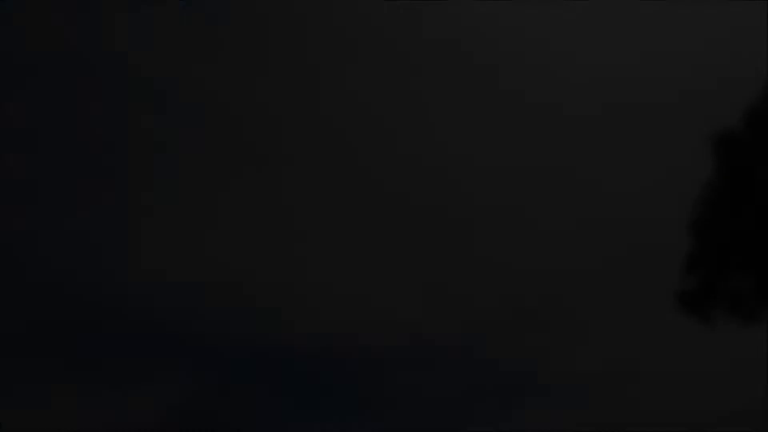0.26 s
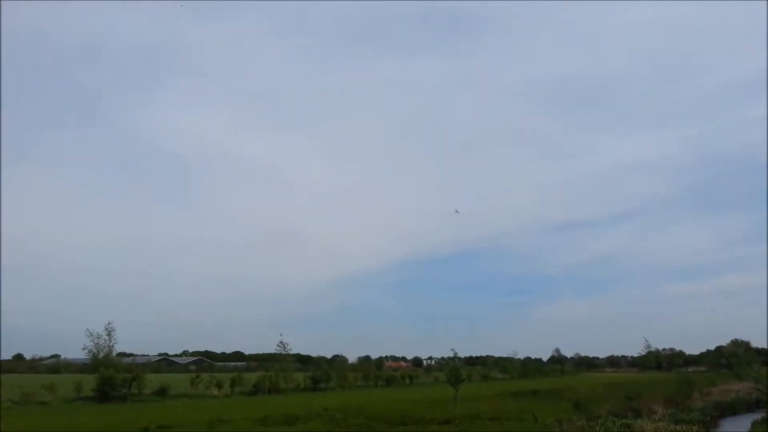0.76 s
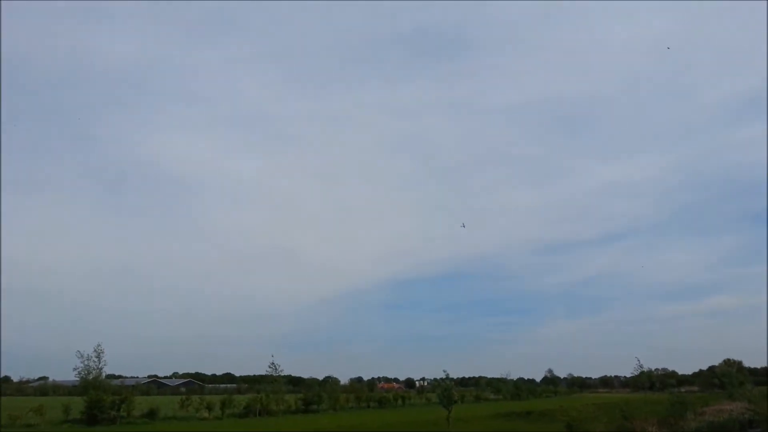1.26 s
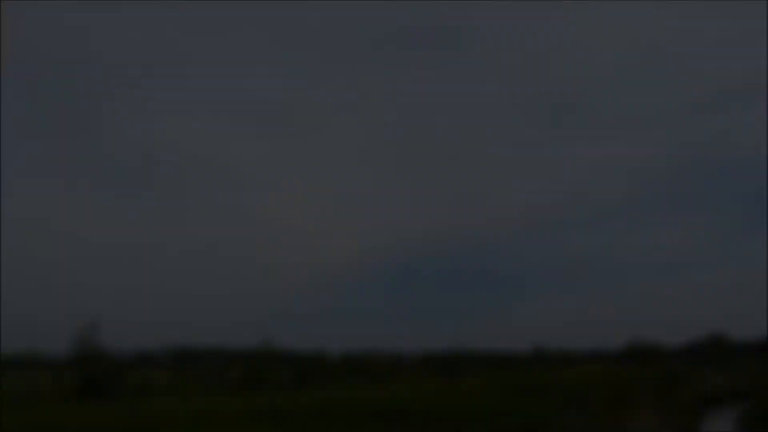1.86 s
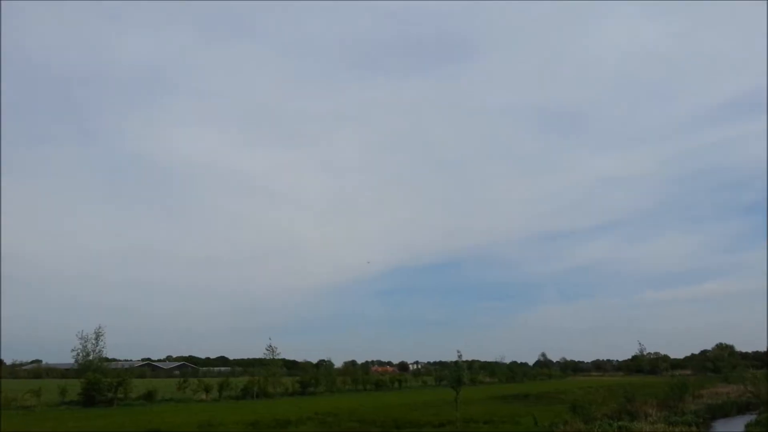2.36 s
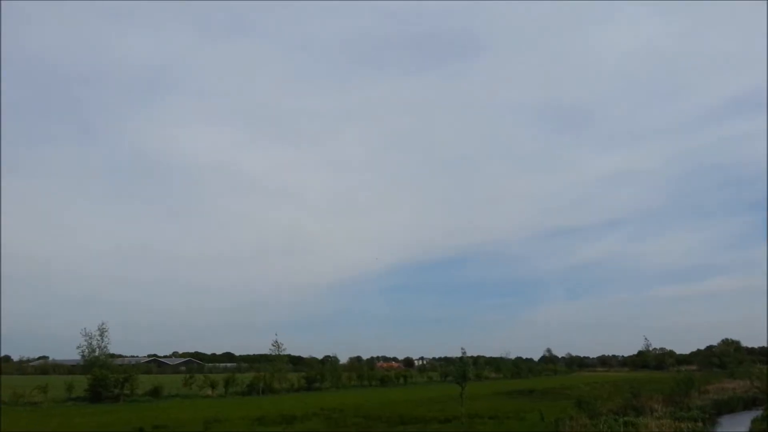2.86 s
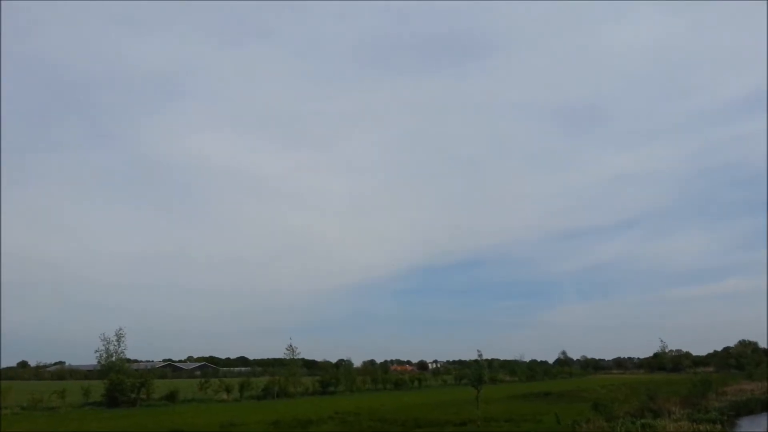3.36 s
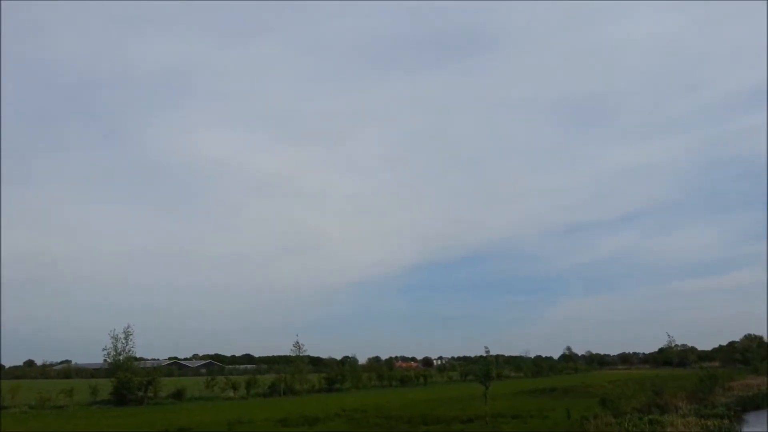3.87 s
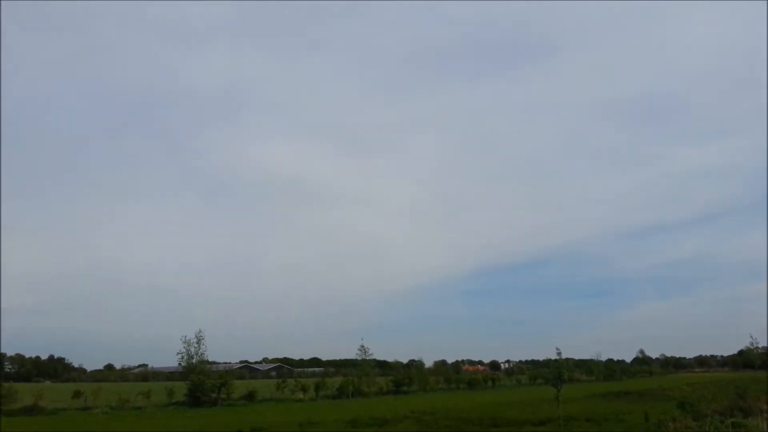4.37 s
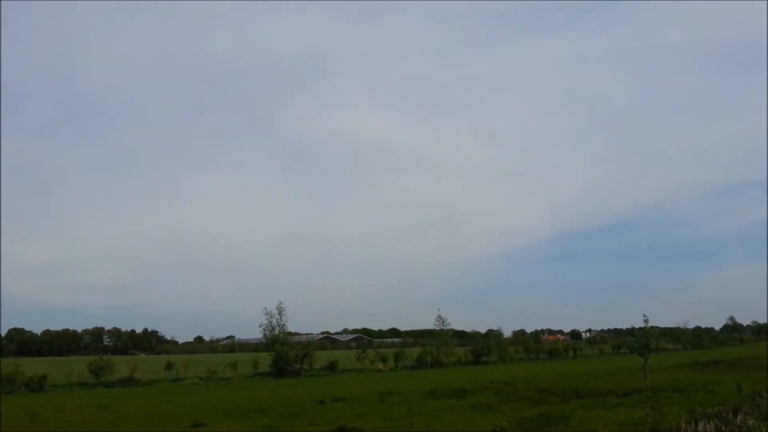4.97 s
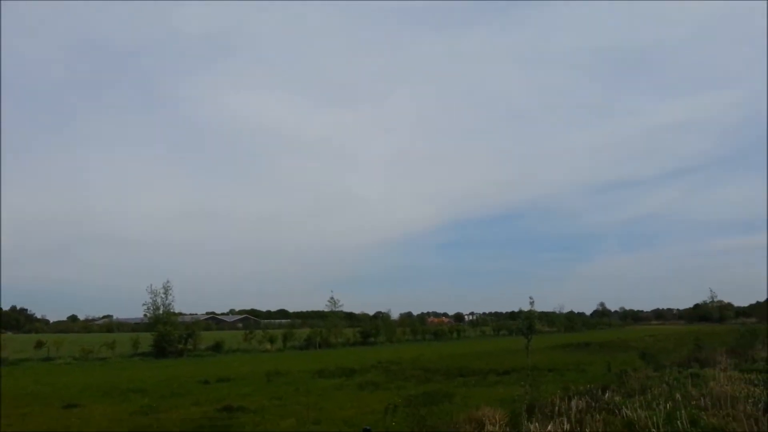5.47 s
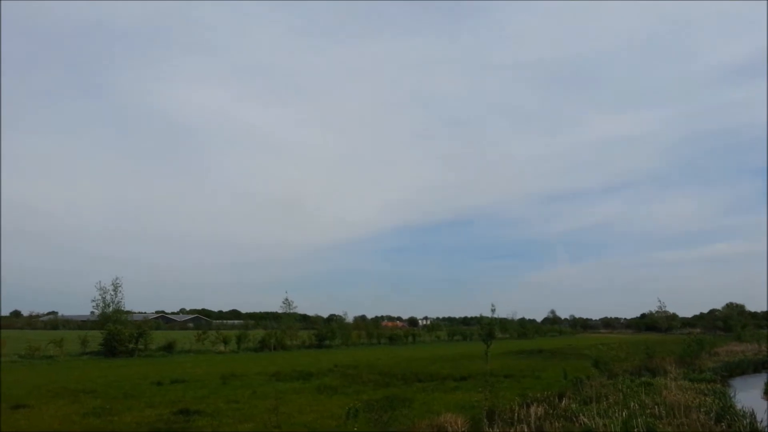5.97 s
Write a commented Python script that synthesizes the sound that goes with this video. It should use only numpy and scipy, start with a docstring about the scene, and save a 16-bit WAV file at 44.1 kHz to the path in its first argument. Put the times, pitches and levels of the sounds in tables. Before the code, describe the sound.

Wind gusts thud on the microphone, then ease to a quiet field with a faint motor hum, distant chirps and a finch's trill.

```python
"""Gusts of wind thud and flutter on a hand-held microphone as swirls of air sweep past its opening.
Under them lie the hush of open fields and a small motor that hums at a steady speed.
Fingers tick and briefly rub on the housing; later a steady, broad hiss sets in and stops abruptly.
A thin high tone comes and goes, and the motor's gear clicks.
Small birds chirp, most of them far off; then a finch sings its falling trill and closing flourish."""
import sys
import numpy as np
from scipy import signal
from scipy.fft import rfft, irfft
from scipy.io import wavfile
from scipy.ndimage import uniform_filter1d, map_coordinates

SR = 44100
rng = np.random.default_rng(int(sys.argv[2]) if len(sys.argv) > 2 else 0)


def materialize(psi):
    """Save the field psi as 16-bit PCM at rate SR to the path in sys.argv[1].

    A 1-D psi becomes a single channel; in a 2-D psi each row is a channel.
    """
    bounded = np.clip(np.atleast_2d(psi).T, -1, 1)
    quanta = np.round(bounded * 32767).astype(np.int16)
    wavfile.write(sys.argv[1], SR, quanta)


N = 274302
TIME_S = np.arange(N) / SR
MOTOR_HZ = 39.78   # turns per second


def amp(db):
    """Turn decibels into a factor to multiply by."""
    return 10 ** (np.asarray(db, float) / 20)


def rms_one(x):
    """Scale a signal so that its average strength (rms) is 1."""
    return x / np.sqrt(np.mean(x ** 2) + 1e-20)


def curves(rows):
    """Join rows of (time_s, values...) with straight lines: one curve for each value."""
    times, *columns = np.transpose(rows)
    return [np.interp(TIME_S, times, column) for column in columns]


def coloured_noise(spectrum, size=N, sample_rate=SR):
    """Noise of strength 1, shaped by rows of (frequency, level_db)."""
    freqs = np.maximum(np.fft.rfftfreq(size, 1 / sample_rate), 1e-3)
    row_freqs, row_db = np.transpose(spectrum)
    gain = amp(np.interp(np.log(freqs), np.log(row_freqs), row_db, left=-120, right=-120))
    return rms_one(irfft(rfft(rng.standard_normal(size)) * gain, size))


def drift(rate_hz):
    """A smooth random wander of strength 1; a higher rate wanders faster."""
    r = np.exp(-2 * np.pi * rate_hz / SR)
    wander = signal.lfilter([1], [1, -2 * r, r * r], rng.standard_normal(N + 20000))
    return rms_one(wander[20000:])   # skip the filter's warm-up


def add(out, start_s, sound):
    """Mix a sound into out at the given time."""
    i = max(round(start_s * SR), 0)
    out[i:i + len(sound)] += sound[:len(out) - i]


def wind():
    """A fixed pattern of swirls sweeps past the microphone: faster air sounds higher and brighter."""
    # the breeze under the gusts: time_s, level_db
    breeze = [(0.0, -22.5), (0.08, -29), (0.42, -24.5), (0.53, -27.5), (0.74, -40), (1.39, -44.5),
              (1.56, -35.5), (1.71, -30), (1.82, -29.5), (2.04, -36), (2.67, -40), (2.79, -43),
              (6.22, -44.5)]
    # single gusts: start_s, level_db, speed_m_per_s
    gusts = [(0.087, -19.5, 3.3), (0.141, -20, 5.07), (0.167, -17, 3.85), (0.192, -14, 3.84),
             (0.254, -19, 4.05), (0.279, -20, 4.3), (.305, -22, 3.22), (.333, -11, 5.18),
             (0.351, -14, 6.55), (.442, -17, 6.6), (0.452, -8, 9.14), (0.464, -12, 6.56),
             (0.499, -15, 3.76), (0.545, -3, 7.73), (0.563, -5.5, 6.74), (0.581, -17, 4.6),
             (0.598, -26.5, 3.43), (0.697, -19, 3.24), (1.05, -40, 1.88), (1.519, -17, 3.77),
             (1.548, -18, 3.87), (1.58, -21, 2.48), (1.666, -22, 3.2), (1.7, -26.5, 2.62),
             (1.814, -22, 3.23), (1.845, -25, 3), (1.906, -22, 3.2), (1.922, -17, 2.68), (1.946, -18, 3.8),
             (1.972, -21, 3.2), (2.089, -35, 1.96), (2.252, -25.5, 2.42), (2.33, -14.5, 3.3),
             (2.409, -32, 2.02), (2.615, -31.5, 2), (2.69, -32.5, 2.2), (2.721, -23, 3.25),
             (2.767, -28, 2.26), (3.038, -34.5, 1.58), (3.6, -38.5, 1.22), (4.298, -35.5, 1.33),
             (4.5, -37.5, 1.42), (4.64, -39, 1.31), (5.74, -39, 1.49)]
    # strength of the swirls, from large to small: cycles_per_m, level_db
    swirls = [(3, -36), (8, -3.5), (20, -3), (45, -0.5), (90, -9), (160, -21), (300, -43), (600, -62),
              (1500, -85)]
    breeze_m_per_s, gust_m = 2.02, .095   # all gusts are about this long, so fast ones pass quickly
    breeze_db, = curves(breeze)
    power = amp(breeze_db) ** 2
    weighted_speed = power * breeze_m_per_s
    for start_s, level_db, speed in gusts:
        length_s = gust_m / speed
        t = np.arange(round(3 * length_s * SR)) / SR
        sudden_front = np.minimum(t / .004, 1) ** 2
        gust = amp(level_db) ** 2 * sudden_front * np.exp(-(t / length_s) ** 2.5)
        slowing = .6 + .6 * np.exp(-t / length_s)
        add(power, start_s, gust)
        add(weighted_speed, start_s, gust * speed * slowing)
    air_speed = np.clip(weighted_speed / power, .3, 12)   # the strongest gust counts most
    travelled_m = np.cumsum(air_speed) / SR
    points_per_m = 8000
    pattern = coloured_noise(swirls, size=2 ** 19, sample_rate=points_per_m)
    flutter = map_coordinates(pattern, [travelled_m * points_per_m], order=3, mode="wrap")
    flutter /= np.sqrt(uniform_filter1d(flutter ** 2, size=1500) + 0.27)   # let the gusts set the level
    lumps = rms_one(amp(2 * drift(rate_hz=63)))
    low_cut = signal.butter(3, 46.4, "high", fs=SR, output="sos")
    return signal.sosfilt(low_cut, np.sqrt(power) * flutter * lumps)


def field_hush():
    """The soft noise of open fields, wavering a little in level."""
    # tone colour of the hush: pitch_hz, level_db
    colour = [(12, -42), (20, 7.5), (52, -6), (146, -37), (210, -14), (388, -10.5), (780, -12), (1220, -17),
              (1910, -17.5), (2910, -22.5), (3440, -22.5), (5530, -22), (7950, -29.5), (14700, -35),
              (16000, -32)]
    return amp(-49 + 1.16 * drift(rate_hz=4.6)) * coloured_noise(colour)


def motor_hum():
    """A steadily turning motor gives tones at multiples of its speed, plus two tones that lie between
    multiples, each wavering in level."""
    # tones of the hum: cycles_per_turn, level_db
    tones = [(1, -47.5), (2, -51), (3, -55.5), (4, -52), (5, -61.5), (6, -63), (8, -66), (14.74, -67.5),
             (20, -66), (22.15, -68.5)]
    angle = 2 * np.pi * MOTOR_HZ * TIME_S
    out = np.zeros(N)
    for cycles, level_db in tones:
        gain = np.sqrt(2) * amp(level_db + 0.83 * drift(rate_hz=4.3))
        out += gain * np.sin(cycles * angle + rng.uniform(0, 2 * np.pi))
    return out


def rubs_and_hiss():
    """Grainy noise: brief early rubs on the housing, then a steady, broad hiss that stops abruptly."""
    # the rubs and, from 1.5 s, the hiss: time_s, level_db, bright_share (0 to 1)
    outline = [(.085, -71, 0.5), (.1, -40.5, 0.7), (.135, -49, 0.66), (.2, -42.5, 0.05), (.24, -48, 0.44),
               (.295, -39, 0.46), (.32, -43, 0.11), (.45, -47, 0.1), (.52, -52.5, 0.33), (.56, -45.5, 0.6),
               (.62, -51, 0.07), (.76, -54, 0.3), (.8, -65, 0.51), (1.01, -66, 0.5), (1.1, -67.5, 0.49),
               (1.5, -72, 0.38), (1.53, -54, 0.34), (2.1, -52, 0.3), (2.2, -52, 0.53), (2.23, -83, 0.39)]
    # the dull and bright tone colours that are blended: pitch_hz, level_db
    dull = [(700, -1), (1300, 5), (2000, 6), (2700, -4.5), (3500, -1), (5000, -36), (8000, -47)]
    bright = [(2500, 3.5), (4000, 3), (6500, 6), (9000, -3.5), (15000, -4.5)]
    level_db, bright_share = curves(outline)
    noise = np.sqrt(1 - bright_share) * coloured_noise(dull)
    noise += np.sqrt(bright_share) * coloured_noise(bright)
    sounding = TIME_S < outline[-1][0]
    return amp(level_db + 2 * drift(rate_hz=24)) * noise * sounding


def finger_ticks():
    """Fingers tap the housing: each tap is a tiny burst of noise that sets it ringing."""
    # taps: start_s, level_db, lowest_hz, width_octaves
    taps = [(0.0875, -19, 5500, 0.72), (.1671, -9, 2870, 1.65), (.2214, -33, 4000, 1.15),
            (0.251, -32, 3500, 2.2), (.289, -27, 4000, 1.5), (.38, -37.5, 5030, 1),
            (0.784, -28.5, 3770, 1.14), (.93, -42, 5420, 0.58), (0.9574, -32, 5935, 1.4),
            (1.004, -41, 5970, 1.23), (1.0613, -40.5, 5480, 1.38), (1.073, -40, 6010, 0.95),
            (2.035, -39, 6000, 1.11), (2.1156, -29, 5730, 0.72), (2.124, -20, 5800, 0.45),
            (2.164, -28, 3264, 1.3), (2.2, -39, 5980, 1.15), (2.469, -39, 2762, 1.12)]
    # tones the housing rings at: pitch_hz, level_db, ring_ms (time to fade by 60 dB)
    housing = [(3200, -1, 10.8), (4950, -0.5, 9)]
    out, fade_s = np.zeros(N), .0067
    fade = amp(-60 * TIME_S[:1500] / fade_s)
    for start_s, level_db, lowest_hz, octaves in taps:
        highest_hz = min(lowest_hz * 2 ** octaves, .45 * SR)
        band = signal.butter(2, [lowest_hz, highest_hz], "band", fs=SR, output="sos")
        tick = signal.sosfilt(band, rng.standard_normal(len(fade)) * fade)
        add(out, start_s, amp(level_db) * tick / np.abs(tick).max())
    for pitch_hz, level_db, ring_ms in housing:
        decay, step = amp(-60000 / (ring_ms * SR)), 2 * np.pi * pitch_hz / SR   # both per sample
        ring = signal.lfilter([1, 0, -1], [1, -2 * decay * np.cos(step), decay ** 2], out + 1e-18)
        out += amp(level_db) * (1 - decay) * 4 * ring
    return out


def microphone_pops():
    """A lone swirl (wide pop) or a knock (narrow pop) shoves the microphone's skin, which swings back."""
    # shoves: time_s, level_db, width_ms, direction (+1 push, -1 pull)
    shoves = [(0.0898, 0, 0.073, -1), (0.1688, -2, 0.13, -1), (.267, -9.5, 0.43, 1), (.361, -2.5, 0.37, -1),
              (0.4549, -1, 0.21, -1), (0.458, 0, 0.25, 1), (.537, -1, 1.21, 1), (.551, 6, 0.25, 1),
              (0.572, -9, 0.59, 1), (0.765, -21, 0.052, -1), (0.7843, -20, 0.11, 1), (0.955, -28, 0.1, 1),
              (0.9572, -11, 0.061, 1), (1.527, -5, 0.76, 1), (1.569, -7.5, 0.64, 1), (1.672, -9.5, 0.53, 1),
              (1.948, -21, 0.57, 1), (2.335, -7.5, 1.03, 1)]
    out = np.zeros(N)
    t = np.arange(-200, 2001) / SR
    for time_s, level_db, width_ms, direction in shoves:
        widths = t * 1000 / width_ms
        push = np.exp(-widths ** 2 / 2)
        rebound = .3 * np.exp(-((widths - 3.5) / 2.5) ** 2 / 2)
        add(out, time_s + t[0], direction * amp(level_db) * (push - rebound))
    return out


def repeat(syllable, first_s, level_db, count=1, every_s=0, soft_start_db=0, sink=0):
    """List the notes of a repeated syllable; it may start softly, or sink in pitch by a share each time."""
    notes, swell_s = [], .18
    for k in range(count):
        start_s = first_s + k * every_s
        syllable_db = level_db + soft_start_db * np.exp(-k * every_s / swell_s)
        for delay_s, length_s, *pitches_hz, note_db, buzz in syllable:
            pitches_hz = np.array(pitches_hz) * (1 - sink) ** k
            notes.append((start_s + delay_s, length_s, *pitches_hz, syllable_db + note_db, buzz))
    return notes


def small_bird_notes():
    """List the scattered calls of small birds, as notes for birdsong()."""
    # held and buzzy calls: start_s, length_s, start_hz, middle_hz, end_hz, level_db, buzz (0 to 1)
    calls = [(.2, 0.21, 3560, 3530, 3430, -51.5, 0.48), (.36, 0.11, 5300, 5010, 4950, -58, 0.2),
             (1.089, 0.257, 3462, 3480, 3430, -63, 0.39), (1.125, 0.06, 5600, 5074, 5000, -58, 0.2),
             (2.04, .068, 4906, 3962, 3376, -50, 0.04), (2.44, 0.047, 3852, 3780, 3550, -50.5, 0.06),
             (2.54, .04, 3160, 3168, 2604, -48, .15), (2.87, 0.013, 7210, 6200, 5210, -53, 0.7),
             (2.955, 0.054, 2632, 2904, 3205, -52.5, 0.76), (2.99, 0.0527, 950, 933, 892, -47.5, 1),
             (3.03, .025, 5095, 4497, 4400, -50, 0.47), (3.145, 0.14, 6014, 5960, 5987, -56.5, 0.21)]
    # falling chirps, and high peeps that sag: start_s, length_s, middle_hz, level_db
    chirps = [(1.01, 0.021, 3400, -60), (1.075, .024, 3400, -51.5), (1.155, 0.034, 3483, -54),
              (1.247, 0.036, 3570, -54), (1.356, 0.034, 3450, -54), (2.634, .04, 4476, -51.5),
              (3.167, 0.06, 4080, -49), (4.88, .036, 5573, -56)]
    peeps = [(.82, 0.034, 4600, -55), (1.818, 0.04, 5200, -46), (1.947, .017, 5150, -47.5),
             (2.068, 0.024, 5100, -40.5), (2.19, .019, 5030, -40), (2.443, .025, 4980, -57)]
    # quick upward flicks: start_s, middle_hz, level_db
    flicks = [(1.96, 5443, -48.5), (2.088, 5250, -41), (2.172, 4240, -42), (2.192, 4126, -44),
              (2.212, 4180, -43), (2.232, 4010, -44.5), (2.49, 3480, -48), (2.506, 3424, -47.5),
              (2.524, 3450, -54), (3.238, 3716, -50)]
    # a nearer bird's down-and-up call: delay_s, length_s, start_hz, middle_hz, end_hz, level_db, buzz
    dip = [(0, .041, 3690, 3325, 2860, -2, 0.47), (.035, .041, 2720, 3200, 3280, -0.1, 0.021)]
    notes, fall_hz_per_s = list(calls), 40000
    for start_s, length_s, hz, level_db in chirps:
        half_fall_hz = fall_hz_per_s * length_s / 2
        notes.append((start_s, length_s, hz + half_fall_hz, hz, hz - half_fall_hz, level_db, .23))
    for start_s, length_s, hz, level_db in peeps:
        notes.append((start_s, length_s, hz * 1.05, hz, hz * .95, level_db, .07))
    for start_s, hz, level_db in flicks:
        notes.append((start_s, .0113, hz * .9, hz, hz * 1.1, level_db, .06))
    return notes + repeat(dip, first_s=2.308, level_db=-44, count=2, every_s=.417, sink=.086)


def birdsong(notes):
    """Each note is a gliding whistle; buzz shakes its pitch fast. Hedges and ground add echoes."""
    song, shake = np.zeros(N), drift(rate_hz=650)
    for start_s, length_s, start_hz, middle_hz, end_hz, level_db, buzz in notes:
        u = np.linspace(-1, 1, round(length_s * SR))   # -1 at the note's start, +1 at its end
        bend_hz = (start_hz + end_hz) / 2 - middle_hz
        glide_hz = middle_hz + (end_hz - start_hz) / 2 * u + bend_hz * u ** 2
        wobble = np.resize(shake[round(start_s * SR):], len(u))
        pitch_hz = glide_hz * (1 + .127 * buzz * wobble)
        loudness = np.sqrt(2) * amp(level_db) * np.sqrt(1 - u ** 4)
        add(song, start_s, loudness * np.sin(2 * np.pi * np.cumsum(pitch_hz) / SR))
    farness = np.where((TIME_S > 1.7) & (TIME_S < 2.9), .5, .84)   # a nearer bird sings for a while
    song *= rms_one(amp(3 * farness * drift(rate_hz=94)))   # moving air makes far notes flicker
    t = TIME_S[:SR // 2]
    echo_db, echo_fade_s = -2.5, .28
    echoes = rng.standard_normal(len(t)) * amp(-60 * t / echo_fade_s) * (t > .004)
    echoes /= np.sqrt(np.sum(echoes ** 2))
    return song + amp(echo_db) * signal.fftconvolve(farness * song, echoes)[:N]


def whine():
    """One thin, high tone that fades in and out."""
    pitch_hz, level_db, start_s, stop_s, fade_s = 14998, -76, .5, 2.22, .046
    fade = np.clip(np.minimum(TIME_S - start_s, stop_s - TIME_S) / fade_s, 0, 1)
    return np.sqrt(2) * amp(level_db) * fade * np.sin(2 * np.pi * pitch_hz * TIME_S)


def gear_clicks():
    """A gear goes round once in three motor turns; its contacts ring briefly, never quite equally loud."""
    # contacts: place_in_round (0 to 1), pitch_hz, ring_ms, level_db
    contacts = [(.66, 1890, 25, -48), (.35, 1890, 25, -58), (.73, 7050, 24, -55), (.13, 7050, 24, -57),
                (.51, 7050, 24, -57), (.93, 9230, 22, -57), (.36, 9230, 22, -58), (.73, 9230, 22, -61),
                (.05, 9230, 22, -61)]
    start_s, round_s, spread_db = 1.6, 3 / MOTOR_HZ, 3
    rounds = np.arange(np.ceil(start_s / round_s), N / SR / round_s - 1)
    out = np.zeros(N)
    for place, pitch_hz, ring_ms, level_db in contacts:
        hits = np.zeros(N)
        hit_samples = ((rounds + place) * round_s * SR).astype(int)
        hits[hit_samples] = amp(level_db + spread_db * rng.standard_normal(len(rounds)))
        decay, step = amp(-60000 / (ring_ms * SR)), 2 * np.pi * pitch_hz / SR   # both per sample
        build_up = np.cos(step * np.arange(132)) * np.hanning(132) / 33   # the ring grows over 3 ms
        drive = signal.fftconvolve(hits, build_up)[:N]
        ring = signal.lfilter([0, np.sin(step)], [1, -2 * decay * np.cos(step), decay ** 2], drive + 1e-18)
        out += ring * amp(2.8 * drift(rate_hz=3.2))
    return out


def finch_notes():
    """List the finch's song: a swelling trill, two slurs, a lower churr and a closing flourish."""
    # its four syllables: delay_s, length_s, start_hz, middle_hz, end_hz, level_db, buzz (0 to 1)
    trill = [(0, 0.02198, 5524, 5500, 5646, -6.5, 0.39), (.014, 0.01044, 6308, 5667, 5334, -4, .5),
             (.022, 0.047, 5307, 5123, 5067, -8, 0.14), (.038, .028, 3872, 4560, 4547, -0.5, .22),
             (.062, .012, 4525, 3750, 2900, -2.5, .6), (.075, 0.033, 3092, 3527, 3516, -2.5, 0.19)]
    slur = [(0, .012, 7240, 5646, 4516, 0, .05), (.025, .04, 2994, 3620, 3808, -7, 0.753),
            (.07, .08, 4350, 3500, 2500, -2, .6)]
    churr = [(0, 0.021, 2973, 3005, 2911, -1, 0.13), (.016, 0.0127, 3210, 3953, 3920, -5, 0.53),
             (.026, .016, 4030, 3408, 2530, 1.5, 0.933), (.043, .022, 1950, 2280, 2600, -2.5, .15),
             (.063, 0.024, 2550, 2603, 2600, -5, 0.23)]
    flourish = [(0, 0.059, 5900, 5630, 4985, 0, 0.69), (.063, 0.0575, 5205, 5445, 5640, -0.5, 0.608),
                (.113, 0.0288, 5630, 4710, 4306, 3, 0.47), (.173, 0.08, 2900, 2587, 2150, -5.5, 0.84),
                (.323, 0.1, 3098, 3480, 3800, -4, 0.43)]
    return (repeat(trill, first_s=3.72, level_db=-37.5, count=7, every_s=.1475, soft_start_db=-18)
            + repeat(slur, first_s=4.756, level_db=-39.5, count=2, every_s=.204)
            + repeat(churr, first_s=5.155, level_db=-46.5, count=5, every_s=.11)
            + repeat(flourish, first_s=5.722, level_db=-43.5))


def scene():
    """All the sounds meet at one microphone."""
    air = field_hush() + wind() + microphone_pops()
    small_noises = finger_ticks() + rubs_and_hiss()
    motor = motor_hum() + gear_clicks()
    birds = birdsong(small_bird_notes() + finch_notes())
    return (air + small_noises + motor + whine() + birds)[None]


def record(dry):
    """The loudest gusts overload the microphone, and the highest treble is cut."""
    clipped = dry / (1 + np.abs(dry / .99) ** 8) ** (1 / 8)
    treble_cut = signal.ellip(12, .5, 55, 15850, fs=SR, output="sos")
    return signal.sosfilt(treble_cut, clipped)


dry = scene()
out = record(dry)
materialize(out)
```